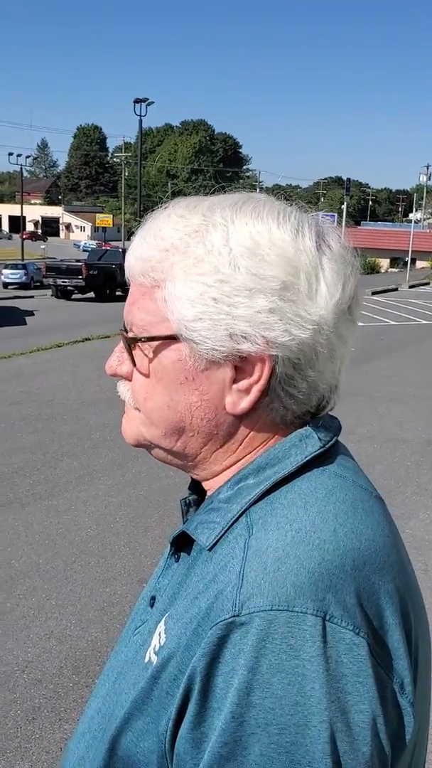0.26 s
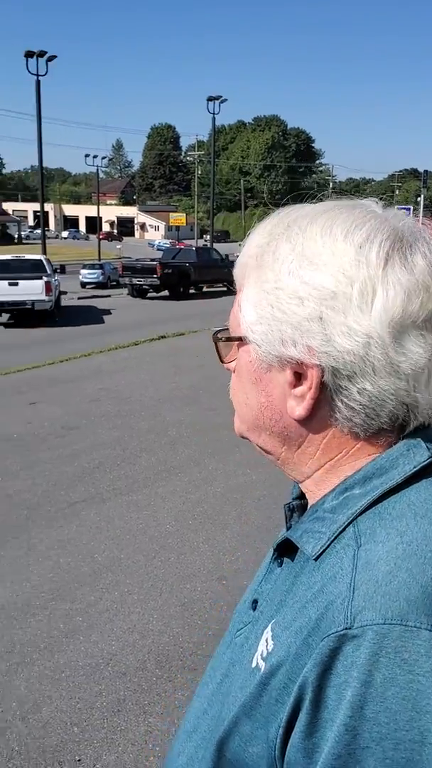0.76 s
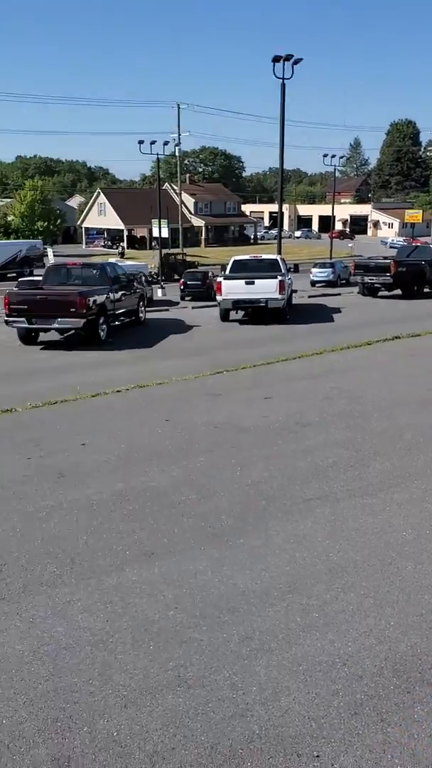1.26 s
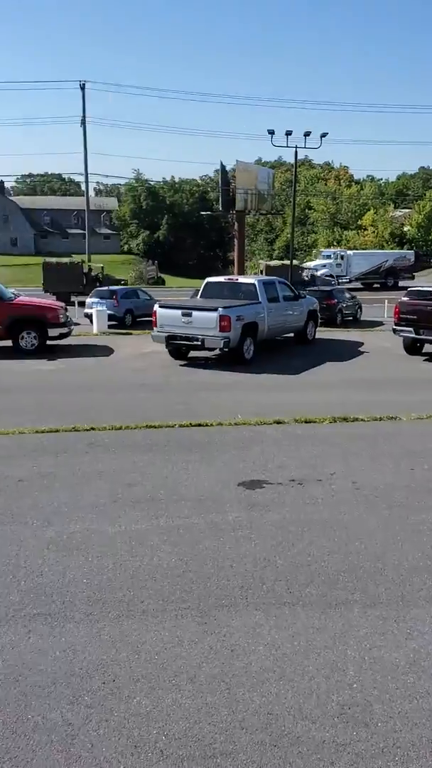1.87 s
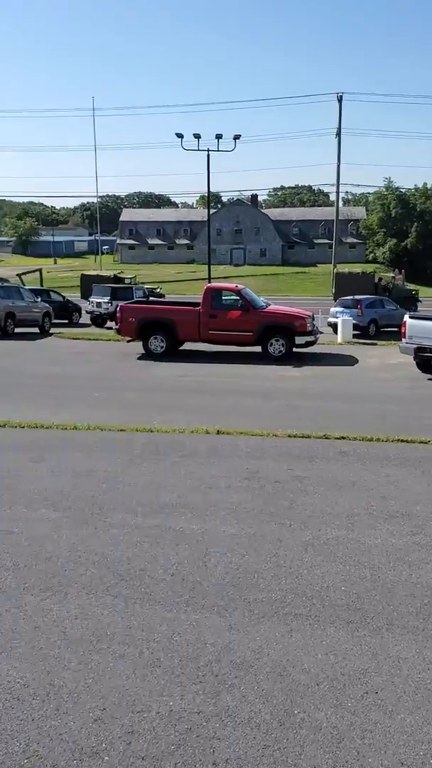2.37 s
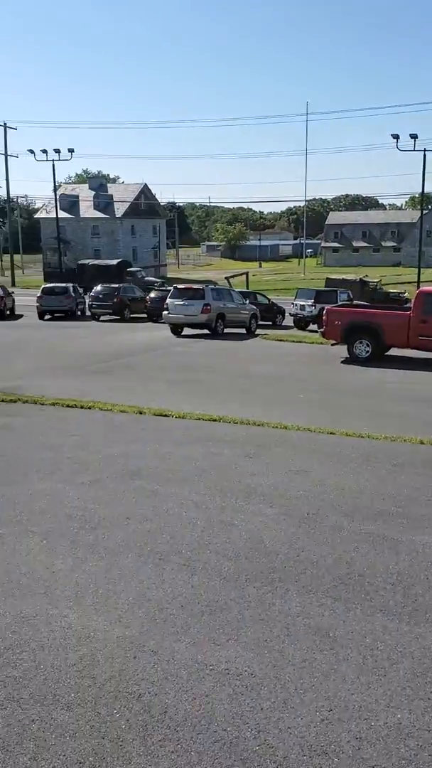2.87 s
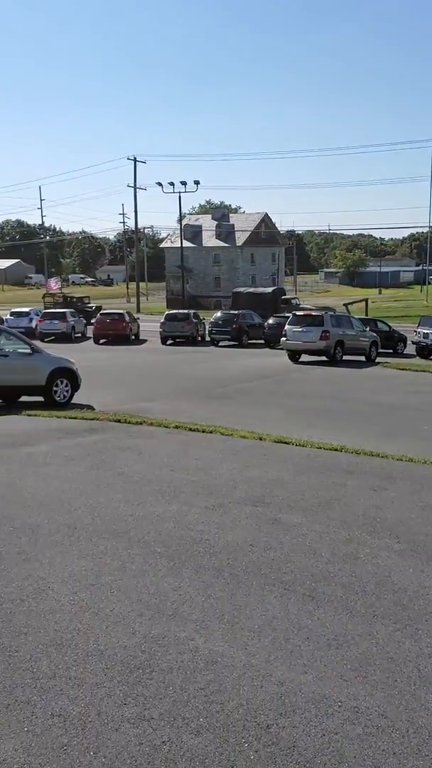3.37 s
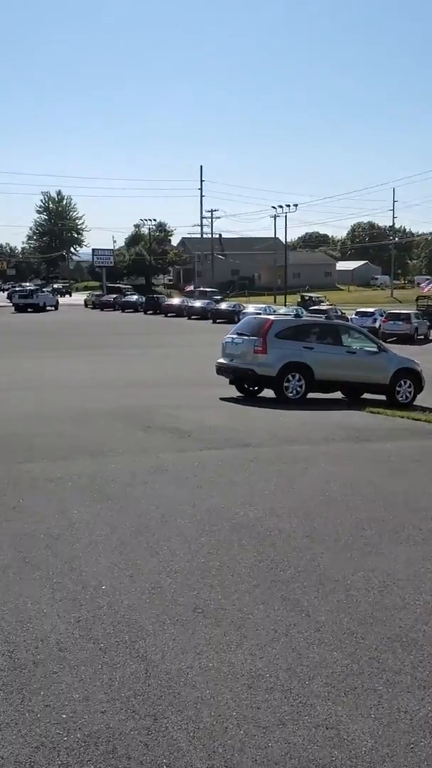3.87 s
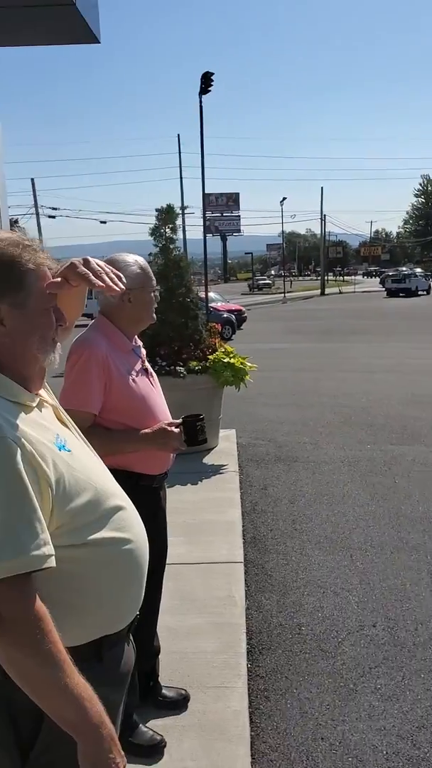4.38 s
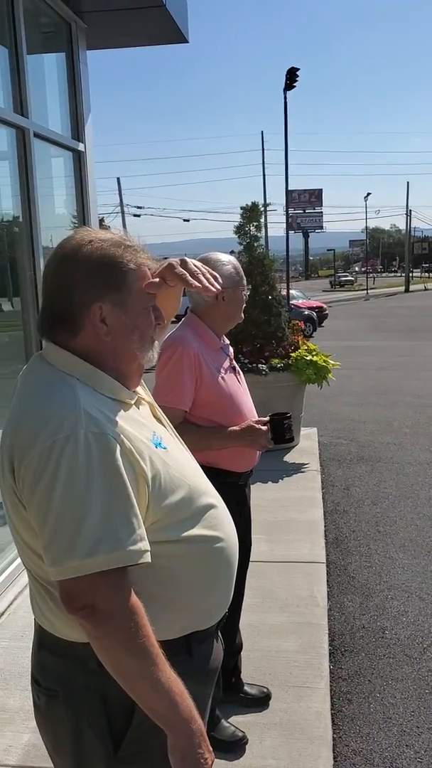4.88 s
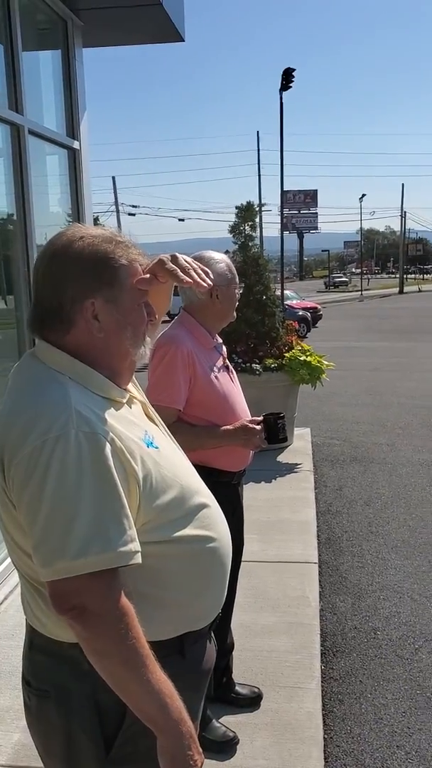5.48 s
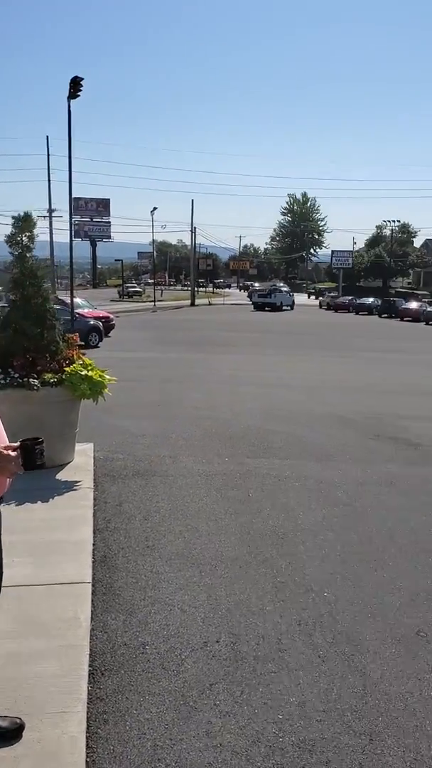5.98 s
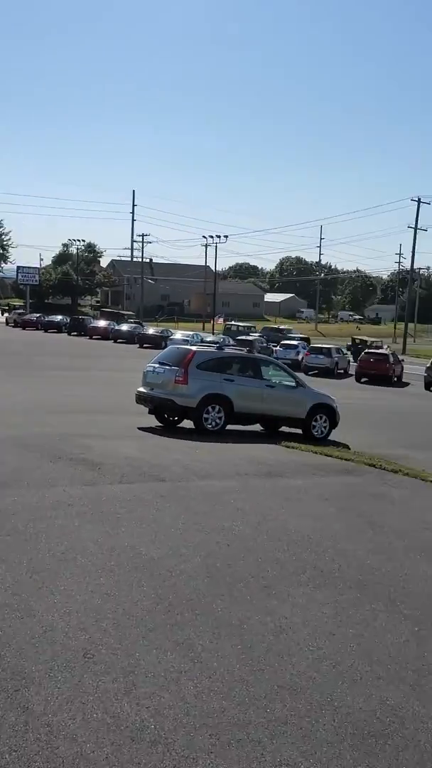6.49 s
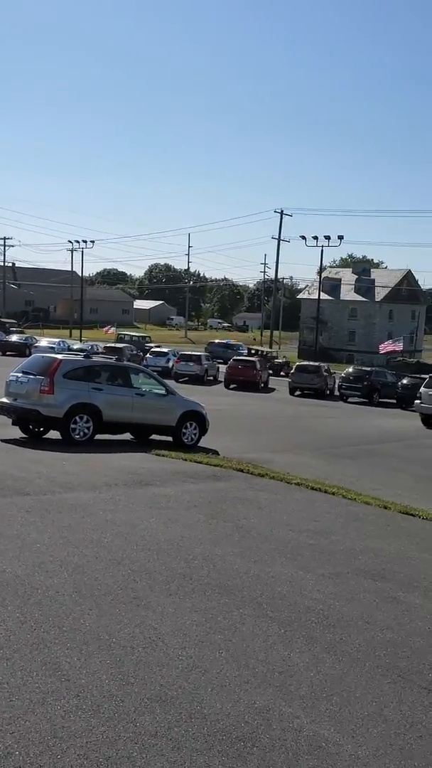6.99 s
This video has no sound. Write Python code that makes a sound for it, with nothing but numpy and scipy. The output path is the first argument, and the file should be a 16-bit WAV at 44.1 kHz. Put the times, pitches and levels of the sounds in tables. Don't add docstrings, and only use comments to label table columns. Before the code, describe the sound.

Outdoors by an open car park, several heavy diesel trucks pull away on a nearby road. A deep engine drone climbs and swells for over two seconds, then the throttle lifts with a short burst of air. It recedes to quieter rumble, before other trucks approach, dip through a gear and climb again with tyre roar, faint whines and metallic squeaks. Stereo handheld microphone, slightly turning.

```python
import sys
import numpy as np
from scipy import signal
from scipy.io import wavfile

SR = 44100
rng = np.random.default_rng(int(sys.argv[2]) if len(sys.argv) > 2 else 0)


def unload_wav(signal):
    wavfile.write(
        sys.argv[1],
        SR,
        np.round(np.clip(np.atleast_2d(signal).T, -1, 1) * 32767).astype(np.int16),
    )


def gain_from_db(level_db):
    decades = np.asarray(level_db, float) / 20
    return 10 ** decades


N = 319284
SIDES = np.array([[1], [-1]])


def engines():
    # start_s, firing_hz, level_db
    near_trucks = [
        [(0.0, 64.91, -20.5), (0.5, 70.12, -21.5), (1.0, 76.09, -19.5), (1.5, 82.49, -12.5),
         (2.0, 90.19, -11.5), (2.5, 98.74, -10.5), (2.75, 105.88, -18.5), (3.1, 107.84, -24),
         (3.5, 90.15, -35.5)],
        [(2.7, 53.02, -43.5), (3.5, 59.36, -35.5), (4.3, 64.84, -23.5), (4.7, 67.99, -28.0),
         (5.1, 70.72, -22.0), (5.6, 74.4, -22.5), (6.1, 76.94, -23.5), (6.6, 79.97, -24.5), (7.1, 82.38, -29.0)],
        [(4.9, 68.77, -33.0), (5.1, 66.61, -24.0), (5.3, 64.31, -28.5), (5.7, 67.11, -25.0),
         (6.0, 69.48, -17.5), (6.4, 71.98, -19.0), (6.8, 75.64, -14.5), (7.24, 79.26, -17.5)],
    ]
    # start_s, firing_hz, level_db
    far_trucks = [
        [(0.0, 76.16, -25.5), (0.35, 81.52, -22.5), (0.6, 80.36, -20.5), (0.85, 86.87, -27.0),
         (1.05, 83.74, -24.0), (1.25, 89.36, -22.5), (1.45, 88.51, -29.0)],
        [(1.6, 72.16, -34.0), (2.3, 74.52, -37.0), (3.0, 75.64, -37.0), (3.7, 78.76, -39.5),
         (4.3, 75.94, -37.0), (4.9, 78.0, -36.5)],
        [(3.8, 100.05, -33.0), (4.2, 103.32, -35.5), (4.7, 107.39, -32.0), (5.3, 112.78, -35.5),
         (5.7, 115.85, -39.0), (6.3, 117.39, -39.5)],
        [(6.05, 92.29, -36.5), (6.5, 96.83, -34.0), (6.8, 102.93, -33.0), (7.0, 107.04, -51.5)],
    ]
    crank_turns = [0, .62, .13, .92, .85, .35, .21]
    heard_orders = [4, 2, 2, 0, 0, 0, 0]
    # order_level_db, frequency_scale
    pipe_fits = [(0, 1), (0, 1.22), (-2, .93)] + [(0, 1)] * 4
    truck_pan_db = [0.07, -2, -1, -0.5, 1.8, -1, 0.5]
    trucks = []
    for rows, turns, count, pipe in zip(near_trucks + far_trucks, crank_turns, heard_orders, pipe_fits):
        trucks.append(truck(rows, turns, count, *pipe, rough_db=.8, flicker_db=1.2))
    lift_s, lift_width_s, lift_depth = 2.66, 0.028, 0.79
    throttle = 1 - lift_depth * np.exp(-((np.arange(N) / SR - lift_s) / lift_width_s) ** 2)
    tones = sum(tone * gain_from_db(pan / 2 * SIDES) for (tone, _, _), pan in zip(trucks, truck_pan_db))
    return throttle * tones, trucks


def truck(rows, turns, count, muffle_db, pipe_scale, rough_db, flicker_db):
    # multiple of firing rate, level_db
    orders = [
        (2, 0),
        (3, -8),
        (4, -11),
        (5, -2),
    ]
    hz, firing_db = in_time(rows)
    phase = 2 * np.pi * (turns + np.cumsum(hz) / SR)
    tone = gain_from_db(rough_db * drift(9.6)) * np.sin(phase)
    for k, level_db in orders[:count]:
        level = gain_from_db(level_db + muffle_db + flicker_db * drift(4.6))
        tone = tone + level * pipe_gain(k * hz * pipe_scale) * np.sin(k * phase)
    firing = fade(rows, .1) * gain_from_db(firing_db)
    return np.sqrt(2) * firing * tone, phase, firing


def pipe_gain(hz):
    # centre_hz, width_hz, level_db under the firing tone
    pipe = [(157, 36, -18), (195, 30, -17.5), (213, 24, -23), (242, 36, -17), (274, 36, -16),
            (352, 30, -25), (390, 34, -25), (450, 50, -38), (533, 40, -26)]
    return sum(gain_from_db(level_db) / (1 + (2 * (hz - top_hz) / width_hz) ** 2) ** 2
               for top_hz, width_hz, level_db in pipe)


def tailpipe(phase, firing):
    # multiple of firing rate, level_db under the firing tone
    half_orders = [(5.5, -44), (6.5, -49), (7.5, -50)]
    tones = sum(gain_from_db(level_db + 4 * drift(6)) * np.sin(k * phase) for k, level_db in half_orders)
    return np.sqrt(2) * firing * tones


def blow_off():
    # frequency_hz, level_db per Hz
    jet_spectrum = [(590, -39.5), (1000, -10), (1170, -3.5), (1320, -17), (1510, -5), (2290, -15),
                    (2840, -8), (6720, -11), (8170, -15.5), (14000, -17.5), (15500, -27)]
    opens_s, rise_s, hold_s = 2.653, .005, .035
    t60_low_s, t60_high_s = .85, .35
    t, jet, out = np.arange(SR) / SR, 0, np.zeros((2, N))
    for hz, pair in bands(jet_spectrum, rng.standard_normal((2, 2, SR))):
        t60_s = at_hz([(3000, t60_low_s), (12000, t60_high_s)], hz)
        sputter = gain_from_db(2.1 * drift(30)[:SR])
        jet = jet + pair * sputter * gain_from_db(-60 * np.maximum(t - hold_s, 0) / t60_s)
    jet = jet / np.std(jet[:, t < hold_s]) * np.clip(t / rise_s, 0, 1)
    start = int(opens_s * SR)
    out[:, start:start + SR] = gain_from_db(-34) * jet
    return out


def leak(phase):
    first_s, last_s, level_db = 2.52, 2.64, -64
    puffs = np.maximum(np.cos(phase - 1.5), 0) ** 2 * fade([(first_s,), (last_s,)], .05)
    whistle = 0
    for hz, width_hz in [(9900, 700), (11500, 700), (12800, 600)]:
        whistle = whistle + rms_one(resonance(rng.standard_normal((2, N)), hz, width_hz))
    return gain_from_db(level_db) * puffs * whistle


def whines():
    # start_s, pitch_hz, level_db
    turbos = [
        [(.9, 5900, -74), (1.3, 6600, -65), (1.6, 7180, -68), (1.8, 7550, -62), (1.95, 7950, -71),
         (2.3, 8800, -86)],
        [(2.75, 10000, -80), (3.05, 10620, -75), (3.2, 9950, -73), (3.38, 8700, -77)],
        [(6.5, 7300, -76), (6.7, 7640, -73), (6.93, 7800, -64), (7.24, 8150, -76)],
    ]
    # start_s, pitch_hz, level_db
    lower_lines = [
        [(5.2, 312, -43), (5.45, 325, -41), (5.62, 342, -36), (5.75, 372, -45), (5.87, 402, -41),
         (5.98, 415, -45)],
        [(4.75, 403, -54), (5.1, 423, -48), (5.4, 431.7, -50)],
        [(6.3, 539, -53), (7.0, 559, -46), (7.24, 582, -49)],
        [(6.4, 895, -56), (6.7, 925, -52), (6.95, 955, -56)],
    ]
    return sum(whine(rows, wobble=.003, flicker_db=4) for rows in turbos + lower_lines)


def whine(rows, wobble, flicker_db):
    hz, level_db = in_time(rows)
    phase = 2 * np.pi * np.cumsum(hz * (1 + wobble * drift(40))) / SR
    return np.sqrt(2) * fade(rows, 0.017) * gain_from_db(level_db + flicker_db * drift(40)) * np.sin(phase)


def bodywork():
    # centre_hz, width_hz, level_db
    panels = [(2564, 650, 1), (3860, 570, -2), (4410, 380, -1.5), (5440, 170, -10.5)]
    out = 0
    for hz, width_hz, level_db in panels:
        mid, side = resonance(rng.standard_normal((2, N)), hz, width_hz)
        out = out + gain_from_db(level_db + 2.4 * drift(8)) * rms_one(at_ports(mid, side, hz))
    return out


def squeaks():
    # centre_s, level_db, pitch_hz,
    # width_hz, length_s
    scrapes = [(1.95, -56, 5800, 2500, .015), (2.03, -57, 6500, 600, .03), (2.15, -56, 5950, 500, .03),
               (2.68, -47, 6700, 600, .06), (2.91, -54, 5800, 120, .03), (4.775, -47, 3600, 300, .035),
               (4.81, -52, 5200, 200, .03), (4.885, -48, 3850, 500, .035), (4.88, -53, 5350, 300, .035),
               (4.96, -52, 5450, 220, .09), (5.06, -52, 5450, 250, .04), (4.99, -55, 6650, 300, .2),
               (4.99, -51, 3650, 300, .03), (5.1, -54, 5200, 250, .03), (5.2, -51, 2850, 150, .1),
               (5.73, -52, 5250, 350, .08), (5.89, -55, 6850, 300, .04), (5.945, -44, 4250, 400, .045),
               (5.945, -54, 6600, 350, .035), (6.05, -53, 5300, 300, .03), (7.0, -54, 5300, 600, .12),
               (7.237, -52, 11000, 7000, .006)]
    out = np.zeros((2, N))
    for s, level_db, hz, width_hz, length_s in scrapes:
        size = int(length_s * SR)
        start = min(int(s * SR) - size // 2, N - size)
        mid, side = resonance(rng.standard_normal((2, SR // 2)), hz, width_hz)[:, -size:]
        burst = np.hanning(size) * rms_one(at_ports(mid, side, hz))
        out[:, start:start + size] += gain_from_db(level_db + 1.5) * burst
    return out


def flanks():
    # closest_s, spread_s,
    # level_db, centre_hz, width_hz
    passes = [(.95, 0.52, -44, 1500, 703), (1.1, .45, -56.5, 3850, 350), (1.1, .5, -58.5, 4450, 300),
              (.95, .3, -66, 9200, 2500), (1.95, 0.47, -47, 632, 250), (2.9, .22, -63.5, 11000, 6000),
              (4.9, 0.35, -52.5, 2900, 1490), (5.2, .5, -37.5, 140, 67), (6.3, .25, -42, 340, 150),
              (5.2, 0.36, -43, 380, 160), (.55, .25, -60, 5000, 180), (.1, .3, -55.5, 3000, 2000),
              (3.1, .3, -41.5, 172, 80), (6.05, .3, -51.5, 4770, 1800), (7.0, .15, -65.5, 10060, 4940)]
    t, out, white = np.arange(N) / SR, 0, rng.standard_normal((2, N))
    for s, spread_s, level_db, hz, width_hz in passes:
        mid, side = resonance(white, hz, width_hz)
        swell = np.exp(-((t - s) / spread_s) ** 2 / 2)
        out = out + gain_from_db(level_db + 1.5 * drift(8)) * swell * rms_one(at_ports(mid, side, hz))
    return out


def clatter(near_phase, third_phase):
    # frequency_hz, level_db per Hz
    clatter_spectrum = [(1060, -30), (1800, -11), (2100, -4), (2840, -4.5), (3250, -7.5), (3510, -4.5),
                        (4440, -8.5), (4930, -11.5), (6680, -10), (8500, -17.5), (11000, -51.5),
                        (18700, -120)]
    knock = 1 + .06 * np.cos(near_phase) + .05 * np.cos(third_phase)
    return knock * low_pass(patchy_noise(clatter_spectrum, shared_db=0.54, own_db=1.08, grain_db=1.0), 7050)


def rattle():
    # frequency_hz, level_db per Hz
    rattle_spectrum = [(6500, -12.5), (7400, -5.5), (9900, -4), (11100, -12), (12500, -7), (14200, -15),
                       (15500, -27)]
    return patchy_noise(rattle_spectrum, shared_db=0.4, own_db=.8, grain_db=.9)


def tyre_roar():
    # frequency_hz, level_db per Hz
    roar_spectrum = [(290, -22.5), (500, -8), (550, -3.5), (1120, -6.5), (1450, -8), (1730, -7),
                     (2100, -13.5), (2730, -45.5), (4620, -120)]
    return low_pass(patchy_noise(roar_spectrum, shared_db=-1.08, own_db=0.74, grain_db=-0.36), 1900)


def rumble():
    # frequency_hz, level_db per Hz
    rumble_spectrum = [(13, -47), (22, -24.5), (68, -4.5), (87, 4), (104, -7.5), (144, -9), (196, -13.5),
                       (396, -21.5), (600, -27.5), (780, -63.5), (1320, -120)]
    return patchy_noise(rumble_spectrum, shared_db=0.27, own_db=1.28, grain_db=1.37)


def convoy():
    # start_s, roar_db, effort_db
    road = [(0.0, -43, -0.5), (0.95, -38, -0.3), (1.15, -38.5, -0.2), (1.41, -41.5, 1.2), (2.36, -47, 1.5),
            (2.78, -43, 2.1), (3.43, -45.5, 0.6), (3.73, -44.5, 0.8), (3.91, -42, -1.5), (4.4, -42.5, -0.7),
            (4.84, -39.5, 0), (5.14, -39.5, -0.7), (5.79, -39.5, -1.1), (6.35, -43, 0.7), (6.94, -42, 1.8),
            (7.24, -41.5, -0.5)]
    return in_time(road)


def listener_turn(sound):
    # start_s, lag in samples of left behind right
    left_lag = [(0, 2.5), (1.2, 4.5), (1.7, -0.5), (2.7, -1.5), (4, 2), (5, 3), (6, 2), (7.24, 0)]
    lag, = in_time(left_lag)
    left, right = gain_from_db((0.16 - 0.05 * lag) / 2 * SIDES) * sound
    left = np.interp(np.arange(N) - np.round(lag), np.arange(N), left)
    return np.array([left, right])


def at_ports(mid, side, hz):
    # frequency_hz, left-right likeness (0-1)
    likeness = [(30, 0.91), (80, 0.86), (150, 1), (380, 0.82), (950, 0.78), (2400, 0.18), (6000, 0.46),
                (15000, 0.1)]
    # frequency_hz, left-right level_db
    ports = [(60, -2.5), (99, 0), (160, 0), (270, -2), (450, -1), (740, 1), (1220, -3), (2010, -0.5),
             (3330, 0), (5500, 5), (9080, -4), (15000, 4)]
    alike = np.clip(at_hz(likeness, hz), 0, 1)
    lean = gain_from_db(at_hz(ports, hz) / 2 * SIDES)
    return lean * (np.sqrt(1 + alike) * mid + np.sqrt(1 - alike) * side * SIDES) / np.sqrt(2)


def patchy_noise(spectrum, shared_db, own_db, grain_db):
    white = rng.standard_normal((2, 2, N)) * gain_from_db(grain_db * drift(90))
    together = drift(24)
    return rms_one(sum(gain_from_db(shared_db * together + own_db * drift(8.0)) * pair
                       for _, pair in bands(spectrum, white)))


def bands(spectrum, white):
    low_hz, top_hz = spectrum[0][0], spectrum[-1][0]
    edges = np.geomspace(low_hz, top_hz, int(3 * np.log2(top_hz / low_hz)) + 2)
    for k, (low, high) in enumerate(zip(edges, edges[1:])):
        slice_filter = signal.butter(2, [low, high], "band", fs=SR, output="sos")
        mid, side = signal.sosfilt(slice_filter, white[k % 2])
        hz = np.sqrt(low * high)
        yield hz, gain_from_db(at_hz(spectrum, hz)) * at_ports(mid, side, hz)


def resonance(x, hz, width_hz):
    r = np.exp(-np.pi * width_hz / SR)
    b = np.array([1, 0, -1]) * (1 - r * r) / 2
    a = [1, -2 * r * np.cos(2 * np.pi * hz / SR), r * r]
    return signal.lfilter(b, a, signal.lfilter(b, a, x))


def low_pass(x, hz):
    return signal.sosfilt(signal.butter(8, hz, fs=SR, output="sos"), x)


def drift(rate_hz):
    r = np.exp(-200 * np.pi * rate_hz / SR)
    steps = rng.standard_normal(N // 100 + 1002)
    slow = signal.lfilter([1], [1, -2 * r, r * r], steps)[1000:]
    return np.interp(np.arange(N) / 100, np.arange(len(slow)), rms_one(slow))


def rms_one(x):
    return x / np.sqrt(np.mean(x ** 2) + 1e-20)


def in_time(rows):
    s, *columns = np.transpose(rows)
    return [np.interp(np.arange(N) / SR, s, c) for c in columns]


def fade(rows, edge_s):
    t, first, last = np.arange(N) / SR, rows[0][0], rows[-1][0]
    rise = np.clip((t - first) / edge_s, 0, 1) if first > 0 else 1
    fall = np.clip((last - t) / edge_s, 0, 1) if last < (N - 500) / SR else 1
    return rise * fall


def at_hz(points, hz):
    return np.interp(np.log(hz), np.log(np.array(points)[:, 0]), np.array(points)[:, 1])


def scene():
    roar_db, effort_db = convoy()

    def gain(usual_db, per_near_db, per_effort_db):
        return gain_from_db(usual_db + per_near_db * (roar_db + 42) + per_effort_db * effort_db)

    tones, trucks = engines()
    _, near_phase, near_firing = trucks[0]
    _, third_phase, _ = trucks[2]
    tones = tones + tailpipe(near_phase, near_firing)
    low = gain(-28, 0.63, -.3) * rumble()
    upper = gain_from_db(roar_db + 1) * tyre_roar()
    upper = upper + gain(-47.5, 1.02, 1.05) * clatter(near_phase, third_phase)
    upper = upper + gain(-65.5, 1.3, 1.6) * rattle()
    upper = upper + gain(-61.5, 2.4, 2.5) * bodywork()
    upper = upper + whines() + squeaks() + blow_off() + leak(near_phase) + flanks()
    return tones + low + listener_turn(upper)


def band_limit(x):
    return signal.sosfilt(signal.butter(12, 15690, fs=SR, output="sos"), x)


def record(dry):
    mix = low_pass(dry, 14800)
    return band_limit(mix)


dry = scene()
out = record(dry)
unload_wav(out)
```